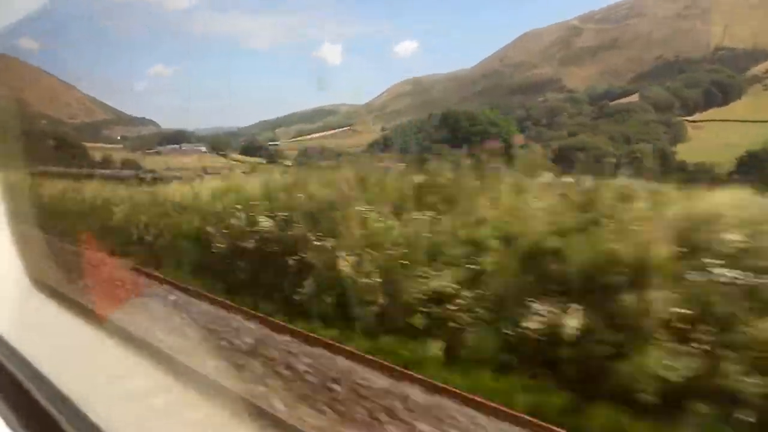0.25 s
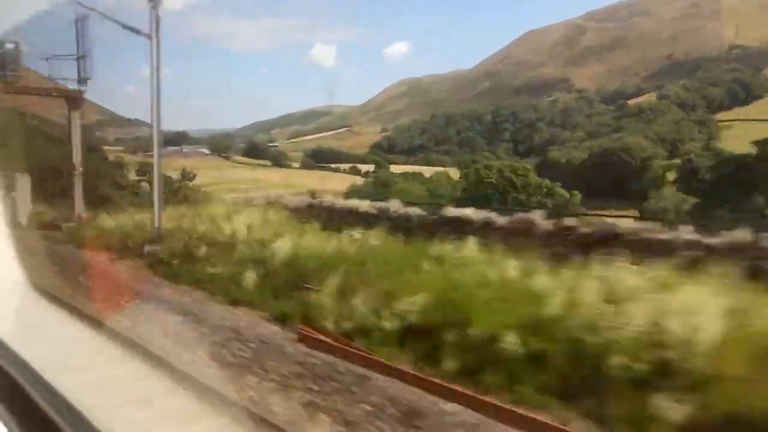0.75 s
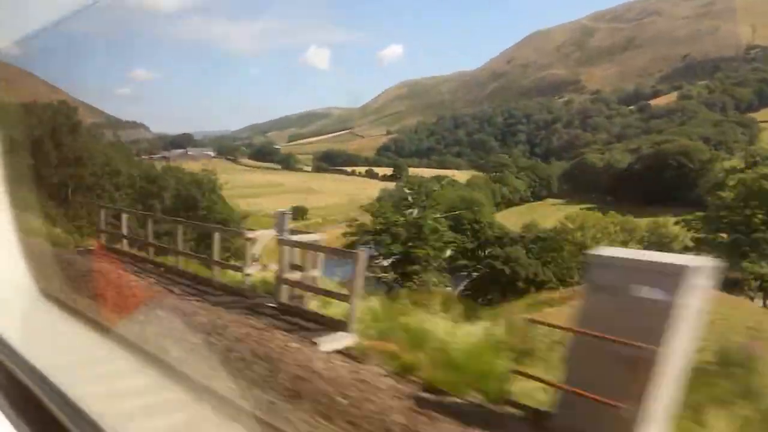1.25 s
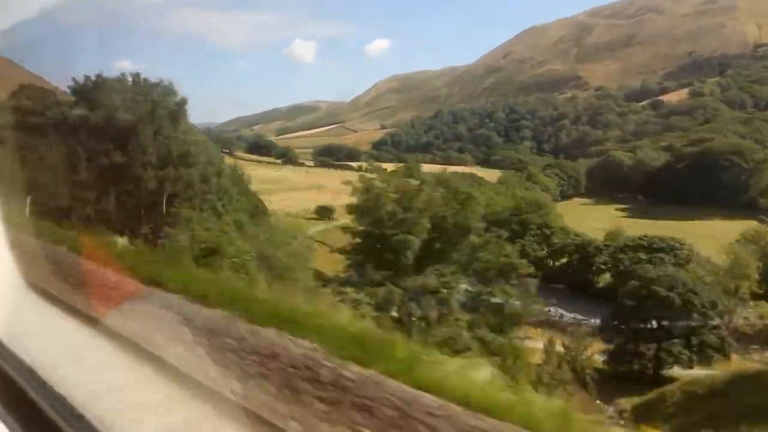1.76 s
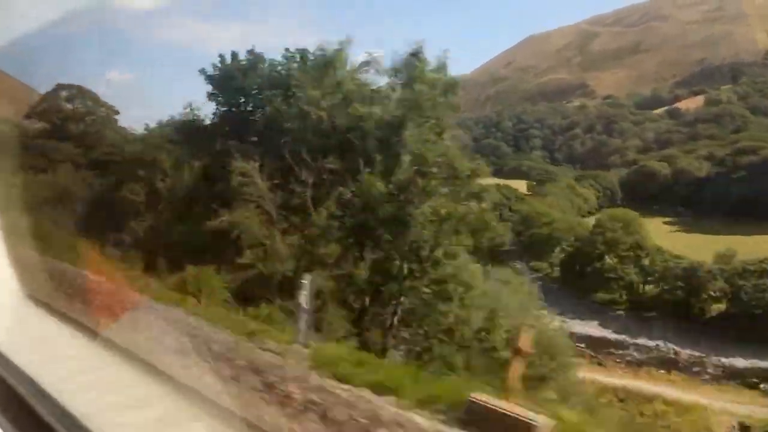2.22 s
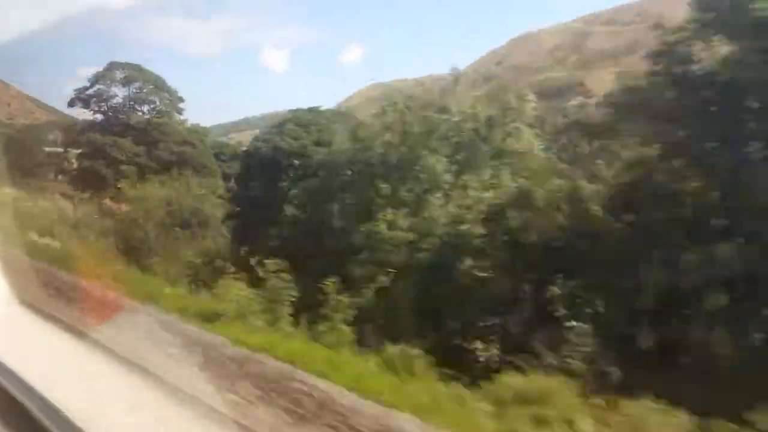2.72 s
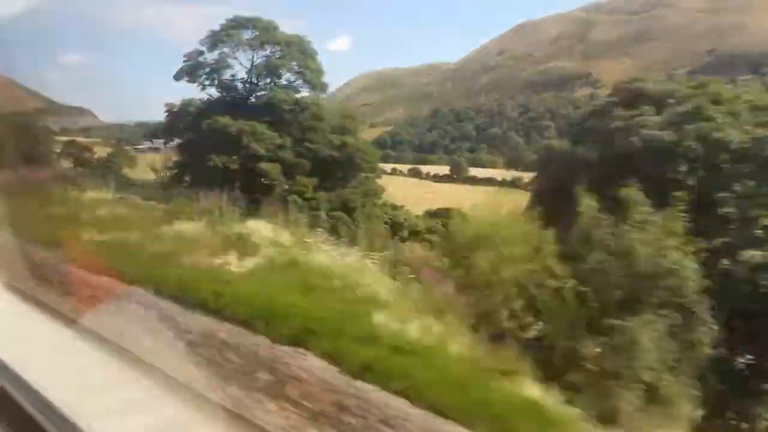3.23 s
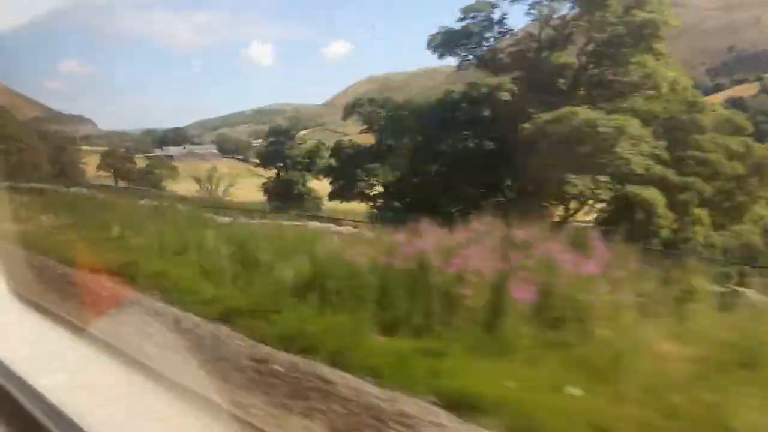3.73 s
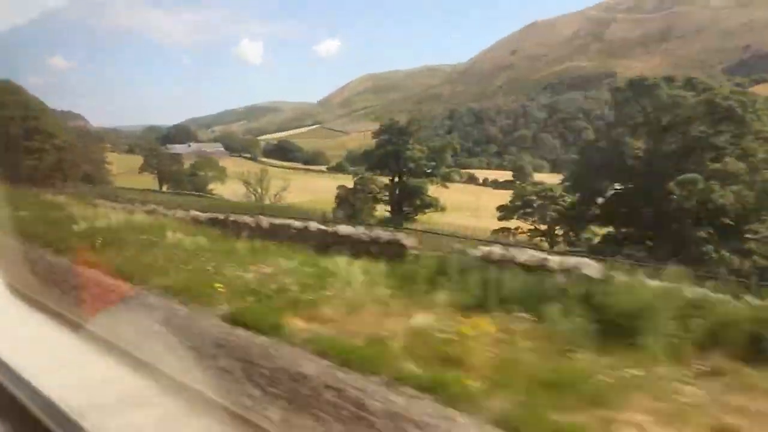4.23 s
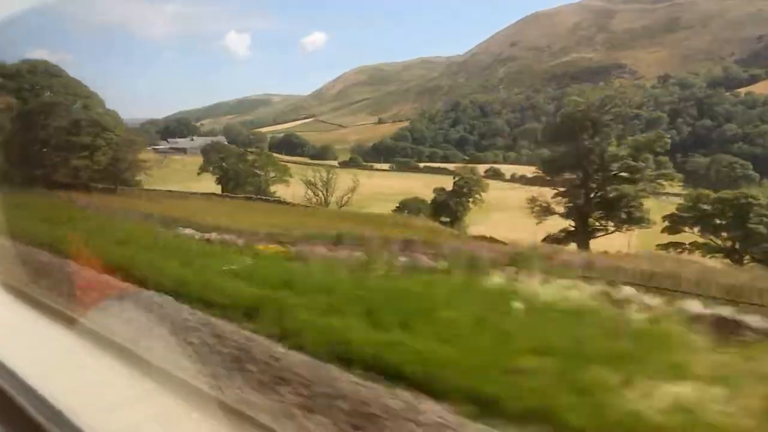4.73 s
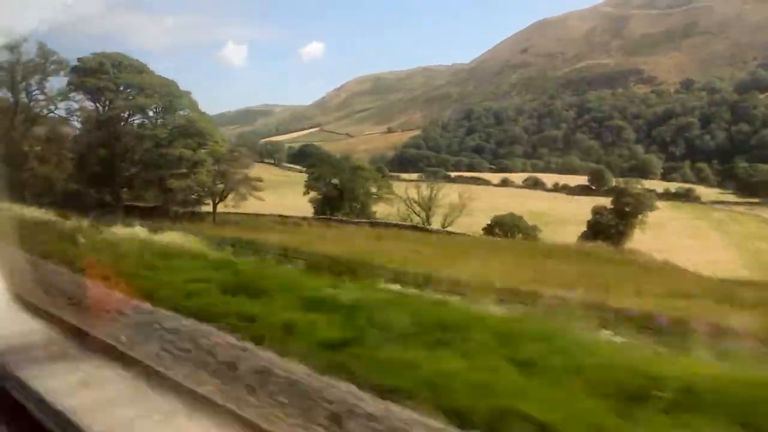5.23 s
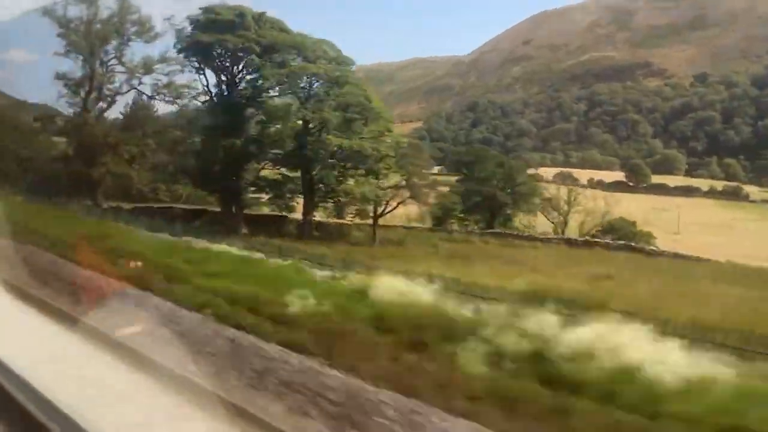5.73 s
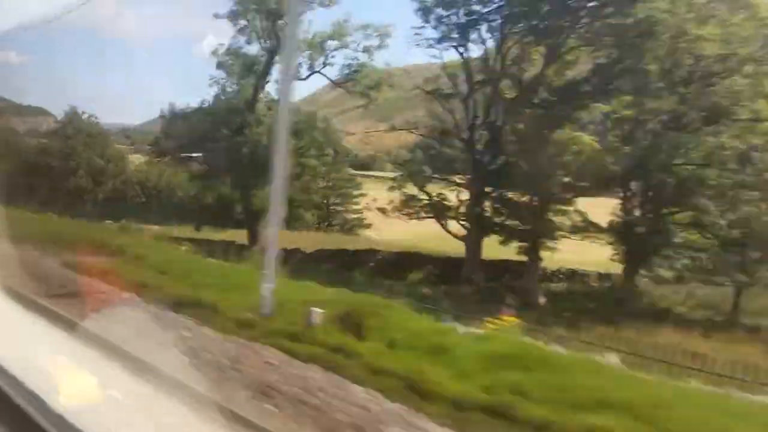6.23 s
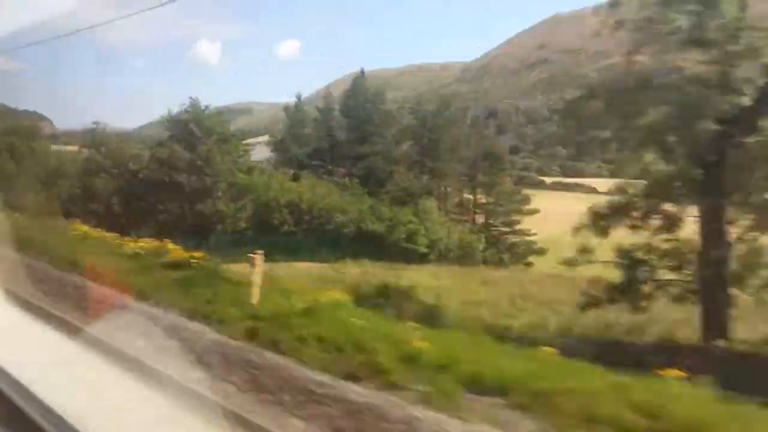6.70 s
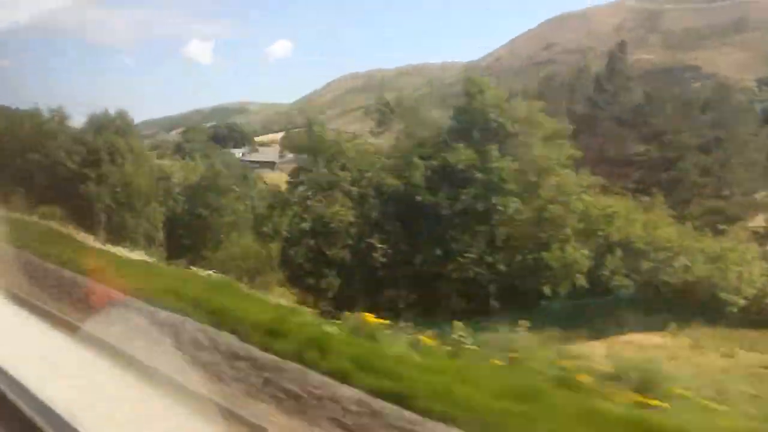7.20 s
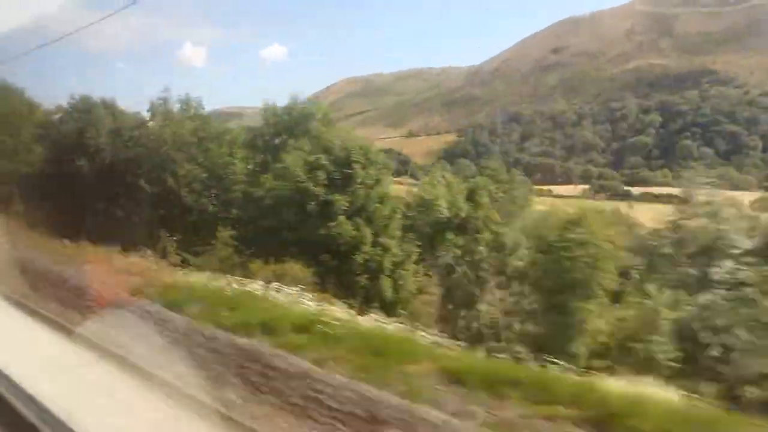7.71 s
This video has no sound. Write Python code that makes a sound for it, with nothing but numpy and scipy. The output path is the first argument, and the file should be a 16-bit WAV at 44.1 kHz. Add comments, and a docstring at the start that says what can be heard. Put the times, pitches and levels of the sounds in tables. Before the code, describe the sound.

Inside a fast train carriage, deep steady floor rumble and rolling wheel noise continue, with a brief bridge thump and later loose plastic clacks.

```python
"""Inside a passenger train at speed, by a window: noise rumbles in the floor, rolls and rings at the wheels and
hisses at the window, while sine tones make the body hum, the gears whine and the motors and fans sing.
A shaft drones at first; a short bridge thumps after 1.2 s, then the hum steps up near 2 s and the drone dies away.
A squeal jumps up at 3.3 s and loose fittings clack after 6 s; rough rail, squeaks and ticks come and go."""
import sys
import numpy as np
from scipy import signal
from scipy.fft import rfft, irfft
from scipy.io import wavfile
from scipy.ndimage import uniform_filter1d

SR = 44100
rng = np.random.default_rng(int(sys.argv[2]) if len(sys.argv) > 2 else 0)


def digitize_waveform(pressure):
    """Quantize a signal to 16-bit integers and store it at the path in sys.argv[1].

    Rows of a 2-D input are taken as channels; values are limited to [-1, 1].
    """
    field = np.atleast_2d(pressure).T
    bounded = np.clip(field, -1, 1)
    quanta = np.round(bounded * 32767).astype(np.int16)
    wavfile.write(sys.argv[1], SR, quanta)


N = 351028
T = np.arange(N) / SR  # time of each sample [s]
HZ = np.maximum(np.arange(N // 2 + 1) * SR / N, 1)  # frequency of each spectrum bin [Hz]
SLEEPER_HZ = 73.57  # how often the sleepers pass [Hz]
WHINE_HZ = 1566.5  # pitch of the gear whine [Hz]


def undb(db):
    """Turn decibels into a plain factor of loudness."""
    return 10 ** (np.asarray(db) / 20)


def unit(x):
    """Scale a signal to an average (RMS) strength of 1."""
    return x / np.sqrt(np.mean(x ** 2))


def curves(table):
    """Each column of a table as a curve over time."""
    s, *columns = np.transpose(table)
    return [np.interp(T, s, column) for column in columns]


def over_hz(points):
    """Points joined by straight lines on a log-frequency axis."""
    hz, value = np.transpose(points)
    return np.interp(np.log(HZ), np.log(hz), value)


def walk(rate):
    """Smooth random wander with spread 1; a higher rate [Hz] wanders faster."""
    slow_part = rfft(rng.standard_normal(N)) * np.exp(-(HZ / rate) ** 2)
    return unit(irfft(slow_part, N))


def pan(db):
    """Make the left side this many dB louder than the right."""
    return undb(np.array([[db], [-db]]) / 2)


def turn(hz):
    """Phase of something that turns at hz, from a random start."""
    return 2 * np.pi * (np.cumsum(hz) / SR + rng.random())


def swell(s, length):
    """A smooth rise and fall around a moment."""
    return np.exp(-.5 * ((T - s) / length) ** 2)


def swells(table):
    """Each row rises and falls around its moment; one sum over time for each column of rises."""
    return sum(np.outer(rises, swell(s, length)) for s, length, *rises in table)


def cabin_noise(spectrum):
    """Stereo noise of a given colour; low frequencies reach both sides more alike than high ones."""
    # likeness of the two sides: (frequency [Hz], correlation)
    likeness = [(25, 0.93), (60, 0.5), (130, 0.92), (290, 0.94), (450, 0.85), (640, 0), (1400, 0)]
    alike = np.clip(over_hz(likeness), -1, 1)
    mid, side = rfft(rng.standard_normal((2, N)))
    pair = mid * np.sqrt(1 + alike) + np.array([[1], [-1]]) * side * np.sqrt(1 - alike)
    # fade out below the first point and above the last
    low_skirt = np.minimum(HZ / spectrum[0][0], 1) ** 2
    high_skirt = np.minimum(spectrum[-1][0] / HZ, 1) ** 3
    return unit(irfft(pair * undb(over_hz(spectrum)) * low_skirt * high_skirt, N))


def steady(x, seconds):
    """Even out the slow swells of a vibration, so that its drive sets the level."""
    power = uniform_filter1d(np.mean(x ** 2, axis=0), int(seconds * SR))
    return x / np.sqrt(power + 1e-9)


def knocks(table, spectrum, rise_s):
    """Each blow sets off a dense ring of noise that dies quickly."""
    drive = 0
    for s, db, decay_s in table:
        age = np.maximum(T - s, 0)
        drive = drive + undb(db) * (1 - np.exp(-age / rise_s)) * np.exp(-age / decay_s)
    return cabin_noise(spectrum) * drive


def underfloor(beat):
    """A shaft shakes the floor once a turn and drones at three times that; the bogies rumble over the sleepers."""
    # loudness of the shaft drone: (time [s], level [dB])
    drone_levels = [(0, -27.5), (.35, -26.5), (.45, -29), (.53, -26.5), (.67, -31), (.8, -27.5),
                    (1.1, -22.5), (1.33, -23.5), (1.45, -26.5), (1.62, -26), (1.9, -27), (2.04, -30),
                    (2.18, -24), (2.3, -42.5), (7.96, -44)]
    # loudness of the floor rumble: (time [s], level [dB])
    rumble_levels = [(0, -30), (2.3, -30.5), (2.7, -33), (3.1, -30.5), (3.7, -28), (4.2, -32), (5.2, -31),
                     (5.6, -28.5), (7.96, -30)]
    # dips in the track that make the floor heave: (time [s], half length [s], rise of the rumble [dB])
    heaves = [(1.25, 0.14, 2), (4.55, 0.046, 7.5), (5.7, 0.05, 2.5), (6.46, 0.042, 5), (6.66, 0.035, 5),
              (7.02, 0.05, 5), (7.89, 0.03, 6)]
    # colour of the floor noise: (frequency [Hz], level [dB per Hz])
    floor_colour = [(8, -19), (22, -11.5), (33, -17), (44, -2.5), (56, -7.5), (70, -0.5), (82, 1.5),
                    (96, -1), (114, -9), (135, -7), (200, -27), (400, -60.5)]
    shaft_hz = 24.76

    shaft = turn(shaft_hz * (1 + 0.0016 * walk(1.4)))
    shaking = np.sqrt(2) * np.sin(3 * shaft) + undb(-12.0) * np.sin(shaft)
    drone = shaking * undb(curves(drone_levels)[0] + 0.77 * walk(6))

    throb_growth = np.clip(T / 2 - .5, 0, 1)  # grows from 1 s to 3 s, as the drone dies away
    throb = undb(-2.0) * throb_growth * np.sin(beat + 0.9 * walk(2.0))
    rumble_db = curves(rumble_levels)[0] + swells(heaves)[0] + 1.0 * walk(9.7)
    rumble = (steady(cabin_noise(floor_colour), 0.16) + throb) * undb(rumble_db)
    return drone * pan(-4.0) + rumble * pan(-.3)


def body():
    """The sleepers beat into the body panels; rough rail makes the panels boom and roar."""
    # tones of the panels, close to multiples of the sleeper beat: (frequency [Hz], level within the hum [dB])
    panel_tones = [(144.8, -4.5), (220.8, -11), (291.5, -19)]
    # rough patches of rail:
    # (time [s], half length [s], rise of low hum [dB], rise of high hum [dB], rise of roar and top hum tone [dB])
    rough_rail = [(1.95, 0.071, 11.5, 12.5, 8.5), (2.17, 0.11, 4.5, 7, -1.5), (2.48, 0.077, 13, 12, 7.5),
                  (3.68, 0.02, 7.5, 3, 8), (4.13, 0.14, 5, 4, 5), (5.53, 0.098, 3, 8, -1),
                  (5.95, 0.028, 1.5, 8.5, 5), (6.145, 0.035, 7, 6, 9), (6.58, 0.029, 3.5, 7, 9.5),
                  (6.655, 0.028, -4, 6, 6), (7.06, 0.05, 5, 10, 5.5), (7.23, 0.025, -1, -8, 9.5),
                  (7.54, 0.08, 9, 5.5, 2), (7.85, 0.11, 8, 13.5, 4)]
    # colour of the boom: (frequency [Hz], level [dB per Hz])
    boom_colour = [(90, -24.5), (120, -4.5), (140, 2), (160, -0.5), (188, -8.5), (222, -5), (250, -16),
                   (320, -41.5)]
    # colour of the roar: (frequency [Hz], level [dB per Hz])
    roar_colour = [(170, -23.5), (215, -1.5), (255, 0), (293, -2.5), (308, 0.5), (330, 2), (375, -2.5),
                   (410, -0.5), (445, -8), (470, -3.5), (540, -24.5), (900, -45.5)]
    # the train runs onto more resonant track
    track_before_db, track_after_db = -32.5, -30.5
    track_change_s, track_blend_s = 1.97, 0.11
    smooth_roar_db = -39.5  # on smooth track

    rises_db = swells(rough_rail)
    low_rise_db, _, roar_rise_db = rises_db
    changed = np.clip((T - track_change_s) / track_blend_s + .5, 0, 1)
    track_db = track_before_db + (track_after_db - track_before_db) * changed + 0.83 * walk(9.9)

    hum = 0
    for (hz, db), rise_db in zip(panel_tones, rises_db):
        tone = np.sin(turn(hz + 1.314 * walk(2.93)) + .2 * walk(9))
        hum = hum + undb(db + rise_db) * (1 + 0.22 * walk(9.3)) * tone
    hum = hum * undb(track_db + 1.5)
    boom = steady(cabin_noise(boom_colour), 0.09) * undb(track_db - 2.0 + 0.16 * low_rise_db)
    roar_db = smooth_roar_db + roar_rise_db + 1.5 * walk(14.0)
    roar = steady(cabin_noise(roar_colour), 0.053) * undb(roar_db)
    return (hum + boom) * pan(-0.8) + roar * pan(-1.6)


def wheels():
    """Rolling noise comes through the floor; the wheel discs ring above it, louder and rougher when a flange rubs."""
    # loudness of the rolling noise: (time [s], level [dB])
    roll_levels = [(0, -41.5), (.8, -42.5), (1.2, -41.5), (2.4, -43), (3.8, -43), (5.3, -42), (6.6, -42.5),
                   (7.35, -43), (7.96, -43)]
    # flanges brush the rail: (time [s], half length [s], rise of the wheel ring [dB])
    flange_rubs = [(.05, 0.066, 3.5), (1.38, 0.08, 5), (4.02, 0.084, 5), (4.36, 0.06, 4.5),
                   (4.54, 0.055, 6.5), (6.01, 0.028, 7), (6.29, .03, 4), (6.385, 0.03, 4),
                   (6.58, 0.03, 5.5), (6.68, .04, 3.5)]
    # colour of the rolling noise: (frequency [Hz], level [dB per Hz])
    roll_colour = [(300, -22), (500, -2.5), (630, 2.5), (760, 1.5), (860, -1), (930, -6), (1080, -7),
                   (1250, -14.5), (1550, -13), (2100, -19), (3500, -25), (4900, -26.5), (6500, -39),
                   (9000, -56)]
    # colour of the wheel ring: (frequency [Hz], level [dB per Hz])
    disc_colour = [(1700, -25), (2150, -9.5), (2350, 1), (2780, 0.5), (3150, -13), (4200, -12),
                   (6000, -36.5)]
    free_disc_db = -59  # while no flange rubs

    roll = cabin_noise(roll_colour) * undb(curves(roll_levels)[0] + 0.63 * walk(10))
    rub_db = swells(flange_rubs)[0] * (1 + .22 * walk(45))  # the fast wander makes the rub rough
    discs = cabin_noise(disc_colour) * undb(free_disc_db + rub_db + 1 * walk(18))
    return roll * pan(-1.3) + discs * pan(1.0)


def gears():
    """The gear whine swells under load; it arrives by shifting paths, so it wavers differently on each side."""
    # the whine holds louder while the teeth take load: (start [s], end [s], rise [dB])
    gear_loads = [(0, 0.222, 4), (.31, .42, 1), (1.17, 1.287, 9), (1.4, 1.65, 3.5), (1.75, 2.16, 5),
                  (2.237, 2.33, 3), (2.475, 2.74, 8.5), (3.116, 3.32, 5.5), (3.45, 3.95, 2),
                  (4.18, 4.42, 6.5), (4.76, 5.037, 7.5), (5.4, 5.9, 1.5), (6.06, 6.33, 8),
                  (6.58, 6.857, 8.5), (7.123, 7.42, 9.5), (7.44, 7.73, 5.5), (7.76, 7.96, 2)]
    load_blend_s = 0.08
    unloaded_db = -65.5  # whine and fringe are set relative to this

    load_db = 0
    for start, end, db in gear_loads:
        inside = np.minimum(T - start, end - T)
        load_db = load_db + db * np.clip(inside / load_blend_s + .5, 0, 1)
    paths = .4 * np.array([walk(5), walk(5)]) + np.array([[-.6], [.6]])  # phase shift of each side [rad]
    waver_db = 1.6 * np.array([walk(14), walk(24)])
    phase = turn(WHINE_HZ + 1.5 * walk(5)) + paths
    whine = unit(np.sin(phase)) * undb(load_db + waver_db + 1.2) * pan(-2.5)
    # a narrow band of noise around the whine
    fringe = cabin_noise([(1525, -18.0), (1567, 1.5), (1610, -18.5)]) * undb(-2.5 + .35 * load_db)
    return undb(unloaded_db) * (whine + fringe)


def gear_hum():
    """An octave under the whine, two gearboxes of slightly different pitch beat against each other."""
    # loudness of the hum before a cut of 1 dB: (time [s], level [dB])
    hum_levels = [(0, -55), (.75, -50), (1.05, -48.5), (2, -50), (2.9, -47), (3.3, -50), (3.7, -54),
                  (4.08, -45.5), (4.25, -56), (4.62, -49), (4.9, -54), (5.3, -46.5), (5.5, -50.5),
                  (6.2, -49.5), (6.8, -53.5), (7.96, -53.5)]
    lead = np.array([[-.8], [.8]])  # phase of left and right [rad]
    first = np.sin(turn(WHINE_HZ / 2 + .9 * walk(3.2)) + lead)
    second = np.sin(turn(WHINE_HZ / 2 + 15.5 + 1.2 * walk(3.3)) + lead)
    pair = first * (1 + 0.27 * walk(5.5)) + undb(-7.0) * second * (1 + 0.2 * walk(4))
    return unit(pair) * undb(curves(hum_levels)[0] - 1.0) * pan(-8.5)


def window_air(beat):
    """Air hisses along the window; the shaking body chops it into a close pair of spurts on each beat."""
    # loudness of the hiss before a lift of 3.5 dB: (time [s], level [dB])
    air_levels = [(0.05, -62), (0.07, -64.5), (1.16, -63.5), (1.21, -69.5), (1.42, -61), (1.62, -64),
                  (2.84, -61), (2.91, -64.5), (3.52, -63), (4.28, -65), (4.41, -61), (4.78, -68.5),
                  (4.93, -63.5), (6.9, -62), (7.07, -65), (7.31, -60), (7.84, -66.5), (7.88, -62)]
    # colour of the hiss: (frequency [Hz], level [dB per Hz])
    hiss_colour = [(3500, -5.5), (5000, -3.5), (5800, 0.5), (6400, -4.5), (7200, -8.5), (7800, -16.5),
                   (8600, -33.5), (12000, -36.5)]
    lag_s, direct_db = .00036, -7.5

    spurts = sum(np.exp(12 * (np.cos(beat - lag) - 1)) for lag in (0, np.pi / 3))
    flutter = unit(np.sqrt(1 + 2.4 * spurts))
    leak = cabin_noise(hiss_colour)[0]  # a gap in the seal, nearer to the right side
    direct = np.array([np.roll(leak, int(lag_s * SR)), leak])  # so the left side hears it later
    air = unit(cabin_noise(hiss_colour) + undb(direct_db) * direct)
    air_db = curves(air_levels)[0] + 3.5 + 0.84 * walk(14.0)
    return air * flutter * undb(air_db) * pan(.8)


def bridge():
    """A short bridge thumps under the bogie and its railing throws the wheel noise back at the carriage."""
    # the axles jolt over the ends of the bridge: (time [s], strength [dB], decay [s])
    jolts = [(1.226, -30, .018), (1.312, -26, .032), (1.357, -29.5, .018), (1.398, -29, 0.019)]
    # colour of a jolt: (frequency [Hz], level [dB per Hz])
    jolt_colour = [(150, -20), (280, 8), (345, 21), (440, 15.5), (520, 8), (640, 6), (1100, -3.5),
                   (1800, -30), (2700, -16), (3400, -20), (4400, -25), (6000, -44)]
    thumps = knocks(jolts, jolt_colour, rise_s=0.004)
    whoosh = cabin_noise([(1500, -15), (2400, -3), (2900, 5), (3500, -9), (5000, -22)])
    return thumps * pan(-1.5) + whoosh * undb(-56.0) * swell(1.38, .04)


def fittings():
    """The trim clacks, ticks and squeaks as the carriage works; harder contacts are brighter."""
    # clacks of a loose fitting: (time [s], strength [dB], decay [s], brightness [dB per octave])
    clack_blows = [(6.0785, -37, 0.011, -4), (6.0848, -44, 0.0074, -2.5), (6.097, -42, 0.016, -4),
                   (6.26, -40, 0.0091, 0), (6.268, -39.5, 0.009, 0.5), (6.276, -44, 0.013, -3),
                   (6.296, -51, .005, -2), (6.611, -44, 0.033, -7)]
    # colour of a clack before its brightness is added: (frequency [Hz], level [dB per Hz])
    clack_colour = [(500, -8), (900, -2), (1300, 10.5), (1900, 0), (2500, -1), (3000, -4), (3500, 1),
                    (4600, -3), (5600, -8), (7300, -18), (9000, -29), (12000, -36)]
    # light ticks of the trim: (time [s], strength [dB], decay [s])
    tick_blows = [(2.7994, -69, .012), (4.392, -66, .01), (4.4044, -61, .009), (5.0115, -64, .007),
                  (6.1972, -43, .0006)]
    # colour of a tick: (frequency [Hz], level [dB per Hz])
    tick_colour = [(2500, -13), (4500, 1), (6000, 8), (7500, 7), (10000, -3), (13000, -6), (16000, -6)]
    # short squeaks of the trim: (time [s], frequency [Hz], width [Hz], level [dB], length [s])
    squeak_list = [(0.185, 4200, 400, -62, .015), (0.708, 4370, 1100, -59, 0.055),
                   (2.95, 2920, 250, -57, .025)]

    clacks = 0
    for s, db, decay_s, bright in clack_blows:
        colour = [(hz, level + bright * np.log2(hz)) for hz, level in clack_colour]
        clacks = clacks + knocks([(s, db, decay_s)], colour, rise_s=.0005)
    ticks = knocks(tick_blows, tick_colour, rise_s=.0002)
    squeaks = 0
    for s, hz, width, db, length in squeak_list:
        band = cabin_noise([(hz - width, -20), (hz, 0), (hz + width, -20)])
        squeaks = squeaks + band * undb(db) * swell(s, length)
    return clacks * pan(-2.6) + ticks * pan(6) + squeaks


def squeal():
    """Two surfaces stick and slip for a moment in a rough tone that jumps up and sinks a little."""
    # path of the squeal: (time [s], frequency [Hz], level [dB])
    squeal_path = [(3.32, 1640, -72), (3.327, 1660, -60), (3.343, 1700, -61), (3.351, 1790, -68),
                   (3.358, 1825, -57), (3.378, 1845, -53.5), (3.387, 1840, -66), (3.397, 1820, -63),
                   (3.41, 1800, -80)]
    hz, db = curves(squeal_path)
    rubbing = (T > squeal_path[0][0]) & (T < squeal_path[-1][0])
    grip = 1 + .22 * walk(120)
    tone = np.sqrt(2) * np.sin(turn(hz + 16 * walk(120)))
    return tone * grip * undb(db) * rubbing


def machines():
    """The tones of motors and fans swell and fade slowly, differently on each side."""
    # steady tones: (frequency [Hz], level [dB], left minus right phase [rad])
    machine_tones = [(49.3, -43, 0), (352, -49, .2), (463, -57, .2), (1234, -73, 1.5), (1722, -73, 1.5),
                     (2353, -75, 1.5), (3661, -78, 1.5), (5303, -81, 1.5), (5765, -80, 1.5),
                     (5841, -78, 1.5)]
    out = 0
    for hz, db, lead in machine_tones:
        phase = turn(hz + 1.06 * walk(3.47)) + lead * np.array([[.5], [-.5]])
        waver = 1 + 0.15 * np.array([walk(3.3), walk(3.5)])
        out = out + undb(db) * unit(waver * np.sin(phase))
    return out * pan(-1)


def scene():
    """Running gear, drive, air and trim, as heard from the window seat."""
    beat = turn(SLEEPER_HZ * (1 + 0.0029 * walk(1.8)))  # shared by the floor and the window air
    running = underfloor(beat) + body() + wheels()
    drive = gears() + gear_hum() + machines()
    return running + drive + window_air(beat) + bridge() + fittings() + squeal()


def record(dry):
    """The microphones add a thin hiss; the ends are eased and the top is cut."""
    # colour of the microphone hiss: (frequency [Hz], level [dB per Hz])
    mic_colour = [(3000, -14), (9000, -9.5), (13900, -12), (14600, 1), (15500, -3.5), (17000, -9.5)]
    top_hz = 15550
    hiss = cabin_noise(mic_colour) * undb(-71.5)
    ease = np.clip(np.minimum(T, T[-1] - T) / .004, 0, 1)  # 4 ms fades
    top_cut = signal.ellip(10, .2, 80, top_hz, fs=SR, output="sos")
    return signal.sosfilt(top_cut, (dry + hiss) * ease)


dry = scene()
out = record(dry)
digitize_waveform(out)
```